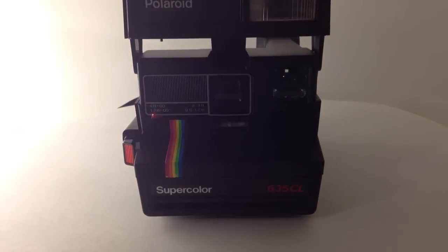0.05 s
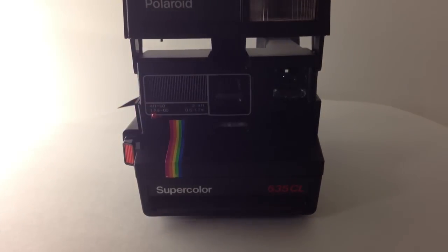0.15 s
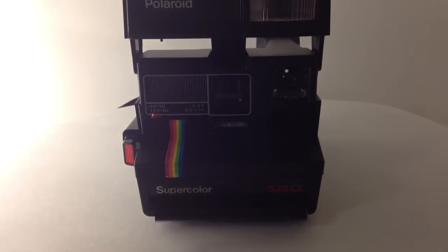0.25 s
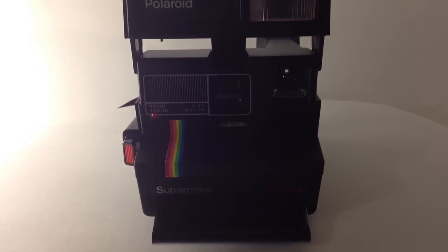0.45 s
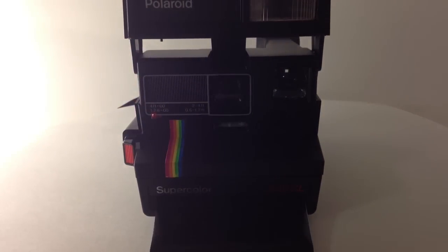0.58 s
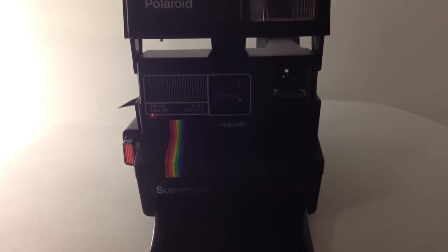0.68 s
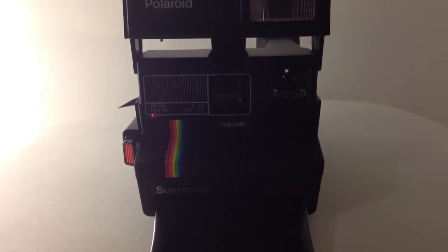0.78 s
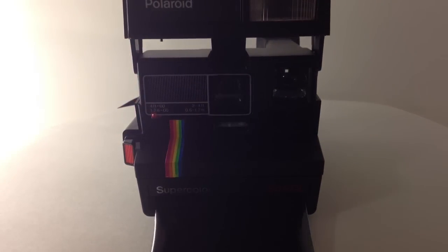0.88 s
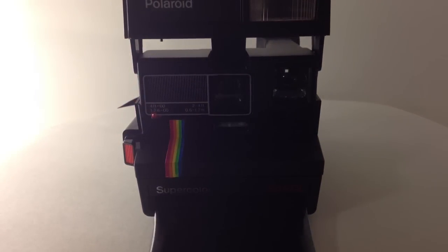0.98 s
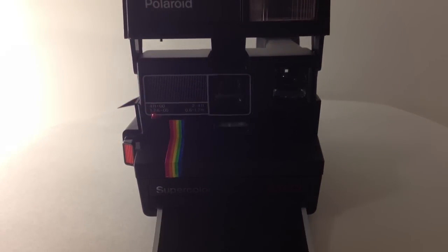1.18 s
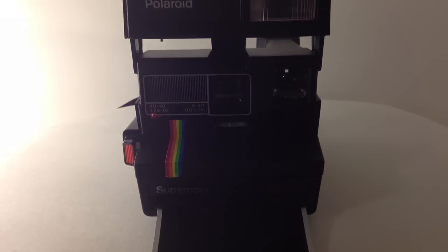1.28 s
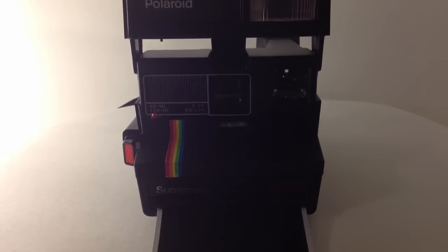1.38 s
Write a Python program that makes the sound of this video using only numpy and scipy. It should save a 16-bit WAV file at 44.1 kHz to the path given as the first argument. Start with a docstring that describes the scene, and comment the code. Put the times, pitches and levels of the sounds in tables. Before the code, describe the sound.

An instant camera's motor whirs, ejecting a film sheet, and ends with a sharp clack.

```python
"""Motor-driven plastic gears whine and rattle as an instant camera ejects a film sheet on a table in a
small room. The sheet squeaks and rasps as the rollers grip it. The mechanism ticks and knocks, then a
sprung lever scrapes over its cam and snaps home; the gears run on faintly. Case resonances colour the
rattle, friction and impacts; a short room tail and a low noise floor lie behind."""
import sys
import numpy as np
from scipy import signal
from scipy.fft import rfft, irfft, next_fast_len
from scipy.io import wavfile
from scipy.ndimage import map_coordinates

SR = 44100
rng = np.random.default_rng(int(sys.argv[2]) if len(sys.argv) > 2 else 0)


def dump(signal):
    """Clip the signal to [-1, 1] and save it as 16-bit WAV at the path in sys.argv[1]."""
    limited = np.clip(np.atleast_2d(signal).T, -1, 1)
    pcm = np.round(limited * 32767).astype(np.int16)
    wavfile.write(sys.argv[1], SR, pcm)


N = 63945
N_FFT = 2 * next_fast_len(N)

# first gear's tooth contacts (time [s], rate [Hz])
TOOTH_RATE = [(0, 1955), (.18, 2093), (.24, 2144), (.295, 2125), (.37, 2189), (.43, 2209), (.55, 2197),
              (.6, 2211), (.7, 2259), (.78, 2302), (.87, 2321), (.97, 2319), (1.04, 2279), (1.12, 2299),
              (1.25, 2100), (1.34, 2234), (1.45, 2132)]
# tooth whine (time [s], harmonic 1 [dB], harmonic 2 [dB], harmonic 3 [dB])
WHINE_LEVELS = [(.14, -66, -70, -77), (.2, -52, -58, -57), (.29, -53.5, -55, -58), (.36, -43, -50, -53),
                (.43, -50, -43.5, -50), (.49, -57, -41.5, -45), (.525, -52, -49, -45),
                (.565, -53, -46, -45), (.59, -49, -43, -62), (.68, -54.5, -45, -54),
                (.76, -51.5, -41.5, -62), (.84, -46.5, -42.5, -69), (.88, -44, -48, -69),
                (.97, -48.5, -40, -66), (1.05, -45, -45.5, -62), (1.12, -55, -35, -60),
                (1.19, -73, -60, -69), (1.25, -93, -88, -87)]
# shafts and slower gears (frequency [x tooth rate], early level [dB], full-load level [dB])
HUM_TONES = [(.1433, -69, -61), (.191, -67, -56), (.2148, -57, -63), (.25, -64, -59), (.2862, -65, -62),
             (.375, -55, -56), (.4375, -55, -54), (.5, -60, -57), (.5467, -58, -56), (.6, -58, -56)]
# gain on all hum tones (time [s], gain [dB])
HUM_GAIN = [(0, -3.5), (.15, -10.5), (.3, -1), (.6, 0.5), (.85, -1.5), (1.08, 0.5), (1.17, -8), (1.22, -44)]
# lone tone as the gears run on (time [s], pitch [Hz], level [dB])
RUN_ON_TONE = [(1.24, 437.6, -91), (1.29, 451.4, -60.5), (1.34, 481.4, -59.5), (1.39, 462.4, -70),
               (1.45, 459, -72)]
# gear rattle, case drone (time [s], level [dB])
RATTLE_LEVEL = [(0, -36), (.04, -42.5), (.11, -40), (.158, -43.5), (.18, -39), (.3, -38), (.55, -36.5),
                (.8, -36.5), (.97, -36.5), (1.04, -34.5), (1.085, -36), (1.125, -29.5), (1.17, -35.5),
                (1.19, -45.5), (1.215, -46), (1.26, -52.5), (1.36, -47.5), (1.45, -52)]
DRONE_LEVEL = [(0, -44.5), (.12, -48.5), (.3, -49), (.6, -51), (.75, -49), (1.02, -50.5), (1.17, -51.5),
               (1.2, -53), (1.28, -54), (1.35, -56), (1.45, -60.5)]
# mechanism contacts (time [s], thud [dB], crack [dB], fizz [dB], T60 [s], part pitch [Hz], part [dB])
CONTACTS = [(0.5978, -38, -28, -21.5, 0.01, 4690, -18), (0.5996, -45, -26, -33, 0.013, 1320, -27),
            (0.6007, -46, -30, -36, 0.011, 2510, -22.5), (0.654, -55, -36, -34, 0.0063, 7100, -30),
            (0.7159, -32, -26, -48, 0.027, 1020, -33), (1.0402, -34, -26.5, -32, 0.029, 1280, -30),
            (1.058, -30, -25, -46, 0.034, 1480, -28), (1.0635, -32, -19, -42, 0.0099, 4830, -20),
            (1.0647, -20, -18.5, -42, 0.021, 1250, -15.5), (1.0686, -29, -28, -44, 0.025, 1280, -20),
            (1.0735, -26.5, -42, -46, 0.031, 1180, -31), (1.1252, -26.5, -37, -39, 0.016, 595, -25),
            (1.1306, -44, -13, -36, 0.0049, 4280, -17.5), (1.136, -25, -26, -41, 0.01, 3580, -36),
            (1.1378, -33, -21, -32, 0.006, 4180, -24), (1.1487, -23.5, -7, -29, 0.0083, 1490, -16.5),
            (1.1529, -42, -13.5, -30, 0.0064, 4000, -20), (1.165, -32, -34.5, -35, 0.074, 760, -24.5),
            (1.1715, -37.5, -47, -48, 0.032, 750, -27), (1.2206, -36.5, -34.5, -41, 0.034, 905, -36),
            (1.4197, -49.5, -45, -48, 0.059, 1425, -43)]
# case ringing after a contact (frequency [Hz], gain [dB], T60 [s])
CASE_MODES = [(458, -25, 0.09), (743, -25, 0.1), (1243, -28, 0.17), (1470, -39, .08), (1890, -26, 0.12),
              (2530, -30, 0.1), (3570, -26, 0.1), (4380, -34, .1)]
# low jolts (time [s], frequency [Hz], level [dB], T60 [s])
LOW_JOLTS = [(1.126, 205, -51, .12), (1.135, 165, -52, .12), (1.141, 62, -53, .05), (1.2215, 180, -58, .11)]
# lever on cam (time [s], rush [dB], fizz [dB])
SCRAPE_LEVELS = [(1.134, -60, -70), (1.1365, -21.5, -27), (1.14, -18.5, -15.5), (1.1425, -22, -24),
                 (1.1455, -20.5, -21), (1.148, -26, -30), (1.156, -33, -35), (1.18, -45, -49),
                 (1.2, -70, -75)]
# sheet entering the rollers (time [s], pitch [Hz], level [dB])
SQUEAK_TONE = [(0, 4070, -42.5), (.055, 3580, -45.5), (.14, 3262, -49.5), (.2, 3280, -49.5),
               (.25, 3280, -43.5), (.335, 3120, -47.5), (.39, 3000, -58), (.422, 3050, -41),
               (.445, 3080, -50), (.52, 3000, -73)]
# roller friction (time [s], level [dB])
RASP_LEVEL = [(.15, -60), (.18, -41), (.27, -41), (.36, -39.5), (.44, -60)]
# source spectra (frequency [Hz], relative gain [dB])
RATTLE_EQ = [(30, -104), (150, -46), (400, -39.5), (900, -6.5), (1060, -13), (1250, -0.5), (1720, -14),
             (2030, -13.5), (2300, -5), (2900, -5.5), (4100, -3.5), (4600, -2), (5100, -5.5), (6700, -3.5),
             (8100, -7.5), (9500, -15.5), (11600, -12), (15500, -19.5)]
DRONE_EQ = [(30, -59), (60, -50), (95, -24.5), (160, -13), (215, -18), (290, -16), (380, -9.5),
            (470, -16.5), (560, -3), (850, -9.5), (1300, 0), (1700, -6), (2600, -13.5), (9000, -81)]
THUD_EQ = [(30, -67), (90, -44), (170, -18), (290, -20), (450, -1.5), (600, 5), (800, -1.5), (1300, 8),
           (2000, -5.5), (4000, -14), (12000, -52)]
CRACK_EQ = [(30, -85), (200, -43), (800, -14.5), (1400, -1), (2000, -4), (2600, 0.5), (3400, 0.5),
            (4200, -0.5), (5000, -10), (6000, -6), (8000, -8.5), (11000, -21), (16000, -32)]
FIZZ_EQ = [(100, -86), (2000, -37), (6000, 9), (8500, 3), (10000, -6), (12000, 0), (15500, -1.5)]
SCRAPE_EQ = [(200, -44), (1500, -17.5), (2600, -8), (4200, 2.5), (5200, -1), (7500, -8), (10000, -17),
             (16000, -30)]
RASP_EQ = [(300, -73), (2500, -19), (3800, -3), (4500, 0.5), (5300, -15), (6400, 0), (8000, -13),
           (15000, -35)]
# case peaks and dips (centre [Hz], width [Hz], gain [dB])
CASE_RESONANCES = [(459, 40, 8.5), (807, 166, 5), (1320, 95, -5), (1865, 70, 6), (2420, 360, 2),
                   (2650, 88, -4.5), (2670, 88, 0.5), (3625, 36, 4.5), (3770, 96, 2), (4650, 150, 3),
                   (6100, 120, -1), (6810, 91, -7)]


def tooth_count(flutter=.0015):
    """Running count of tooth contacts, with slight speed flutter."""
    rate_hz, = curves(TOOTH_RATE)
    return np.cumsum(rate_hz * (1 + flutter * wobble(60))) / SR


def gear_tone(cycles, jitter_rad=.15, shimmer_db=2):
    """Sine with wavering phase and level."""
    phase = 2 * np.pi * cycles + jitter_rad * wobble(130)
    return unit(np.sin(phase) * amp(shimmer_db * wobble(69.65)))


def gear_whine(teeth):
    """Tooth-rate harmonics, rougher with order, plus shaft hum and the run-on tone."""
    whine = sum(amp(db) * gear_tone(k * teeth, jitter_rad=k * .21)
                for k, db in enumerate(curves(WHINE_LEVELS), 1))
    load, = curves([(.53, 0), (.78, 1)])
    hum = sum(amp(early_db + load * (loaded_db - early_db)) * gear_tone(ratio * teeth)
              for ratio, early_db, loaded_db in HUM_TONES)
    hz, db = curves(RUN_ON_TONE)
    run_on = amp(db) * gear_tone(np.cumsum(hz) / SR)
    return whine + hum * amp(curves(HUM_GAIN)[0]) + run_on


def gear_rattle(teeth, rub_share=.72, teeth_per_turn=9.5, swell_db=.67, scatter_db=.25):
    """Uneven tooth impacts and rubbing, swelling once per shaft turn."""
    hits = np.flatnonzero(np.diff(np.floor(teeth)))
    sizes = noise() * amp(scatter_db * noise())
    taps = unit(np.bincount(hits, sizes[hits], N))
    swell = unit(amp(swell_db * np.sin(2 * np.pi * teeth / teeth_per_turn) + .22 * wobble(89.5)))
    force = swell * (np.sqrt(1 - rub_share) * taps + np.sqrt(rub_share) * noise())
    return amp(curves(RATTLE_LEVEL)[0]) * unit(through_case(force, RATTLE_EQ))


def case_drone(flicker_db=.92):
    """Low noisy drone of the case."""
    force = noise() * amp(flicker_db * wobble(110))
    return amp(curves(DRONE_LEVEL)[0]) * unit(through_case(force, DRONE_EQ))


def clacks(attack_s=.00036, click_share=.051, part_t60_s=.016, ring_low_cut_hz=254):
    """Each contact: a click and noise burst in three bands; the struck part and the case ring."""
    power, clicks, ring = np.zeros((3, N)), np.zeros((3, N)), np.zeros(N)
    for start_s, thud_db, crack_db, fizz_db, t60_s, part_hz, part_db in CONTACTS:
        age_s = since(start_s)
        rise = 1 - np.exp(-age_s / attack_s)
        burst_power = (amp([[thud_db], [crack_db], [fizz_db]]) * rise * amp(-60 * age_s / t60_s)) ** 2
        power += (1 - click_share) * burst_power
        clicks[:, round((start_s + 2 * attack_s) * SR)] += np.sqrt(click_share * burst_power.sum(axis=1))
        ring += rise * damped_sine(age_s, part_hz, part_db, part_t60_s)
        for hz, db, mode_t60_s in CASE_MODES:
            # low modes follow the thud, high ones the crack
            drive_db = np.interp(np.log(hz), np.log([450, 4400]), [thud_db, crack_db])
            ring += rise * damped_sine(age_s, hz, drive_db + db + rng.normal(0, 1.4), mode_t60_s)
    # the ringing carries little bass
    ring = signal.sosfilt(signal.butter(2, ring_low_cut_hz, 'high', fs=SR, output='sos'), ring)
    bands = zip(power, clicks, (THUD_EQ, CRACK_EQ, FIZZ_EQ))
    return ring + sum(through_case(noise() * np.sqrt(p) + click, eq) for p, click, eq in bands)


def jolts(rise_s=.008):
    """Soft low thumps under the late knocks."""
    thumps = np.zeros(N)
    for start_s, hz, db, t60_s in LOW_JOLTS:
        age_s = since(start_s)
        rise = 1 - np.exp(-(age_s / rise_s) ** 2)
        thumps += rise * damped_sine(age_s, hz, db, t60_s)
    return thumps


def lever_scrape(grain_db=2.5, grain_hz=2500):
    """Lever skidding over its cam: a short, bright, grainy rush."""
    grain = unit(amp(grain_db * wobble(grain_hz)))
    bands = zip(curves(SCRAPE_LEVELS), (SCRAPE_EQ, FIZZ_EQ))
    return sum(through_case(noise() * grain * amp(db), eq) for db, eq in bands)


def sheet_squeak(jitter_hz=171.3, flicker_db=2):
    """Stick-slip tone that sags and steadies as the rollers take hold."""
    hz, db = curves(SQUEAK_TONE)
    roughness, = curves([(.3, 1), (.41, .099)])
    phase = 2 * np.pi * np.cumsum(hz + jitter_hz * roughness * wobble(760)) / SR
    return amp(db) * unit(np.sin(phase) * amp(flicker_db * wobble(148)))


def roller_rasp(grain_db=2.7, grain_hz=400):
    """Grainy friction of the rollers gripping the sheet."""
    friction = noise() * amp(grain_db * wobble(grain_hz))
    return amp(curves(RASP_LEVEL)[0]) * unit(through_case(friction, RASP_EQ))


def through_case(x, eq):
    """Broad source spectrum with the case resonances on top."""
    hz = np.fft.rfftfreq(N_FFT, 1 / SR)
    eq_hz, eq_db = np.transpose(eq)
    broad_db = np.interp(np.log(hz + 1), np.log(eq_hz), eq_db)
    case_db = sum(db / (1 + (2 * (hz - centre) / width) ** 2) for centre, width, db in CASE_RESONANCES)
    return min_phase(x, broad_db + case_db)


def case_ripple(x, depth_db=1.73, step_hz=40.7, full_depth_hz=5000):
    """Many small case modes ripple the spectrum."""
    hz = np.fft.rfftfreq(N_FFT, 1 / SR)
    ripple = map_coordinates(rng.standard_normal(2000), [hz / step_hz])
    return min_phase(x, depth_db * ripple * np.clip(hz / full_depth_hz, 0, 1))


def room(x, t60_s=.3, rise_s=.0034):
    """Short diffuse tail from table and walls."""
    t = np.arange(SR // 2) / SR
    dull_noise = signal.lfilter([1], [1, -.5], rng.standard_normal(len(t)))
    tail = dull_noise * amp(-60 * t / t60_s) * (1 - np.exp(-t / rise_s))
    return signal.fftconvolve(x, tail / np.linalg.norm(tail))[:N]


def min_phase(x, db):
    """Unit-power minimum-phase filter from relative dB per bin."""
    cepstrum = irfft(np.log(unit(amp(db)) + 1e-6))
    cepstrum[1:N_FFT // 2] *= 2
    cepstrum[N_FFT // 2 + 1:] = 0
    return irfft(rfft(x, N_FFT) * np.exp(rfft(cepstrum)))[:N]


def damped_sine(age_s, hz, db, t60_s):
    """One decaying mode."""
    return amp(db - 60 * age_s / t60_s) * np.sin(2 * np.pi * hz * age_s)


def since(start_s):
    """Seconds since onset, 0 before."""
    return np.maximum(np.arange(N) / SR - start_s, 0)


def curves(rows):
    """Per-sample curve for each column after time."""
    times_s, *columns = np.transpose(rows)
    return [np.interp(np.arange(N) / SR, times_s, column) for column in columns]


def wobble(rate_hz):
    """Smooth random curve, rate_hz knots per second."""
    knots = rng.standard_normal(int(N * rate_hz / SR) + 4)
    return map_coordinates(knots, [np.arange(N) * rate_hz / SR])


def noise():
    """White noise."""
    return rng.standard_normal(N)


def amp(db):
    """dB to gain."""
    return 10 ** (np.asarray(db) / 20)


def unit(x):
    """Scale to RMS 1."""
    return x / np.sqrt(np.mean(x ** 2) + 1e-20)


def scene(room_db=-21, floor_db=-64.5):
    """Close camera, room tail and noise floor; mono."""
    teeth = tooth_count()
    mechanism = gear_rattle(teeth) + case_drone() + roller_rasp() + lever_scrape() + clacks() + jolts()
    body = case_ripple(mechanism) + sheet_squeak()
    mix = body + gear_whine(teeth) + amp(room_db) * room(body)
    floor = amp(floor_db) * unit(through_case(noise(), DRONE_EQ))
    return (mix + floor)[None]


def record(dry, fade_s=.003, top_hz=15550):
    """Fade-in and brick-wall low-pass."""
    fade = np.minimum(np.arange(N) / (fade_s * SR), 1)
    passband = np.fft.rfftfreq(N_FFT, 1 / SR) < top_hz
    return irfft(rfft(dry * fade, N_FFT) * passband, N_FFT)[:, :N]


dry = scene()
out = record(dry)
dump(out)
```